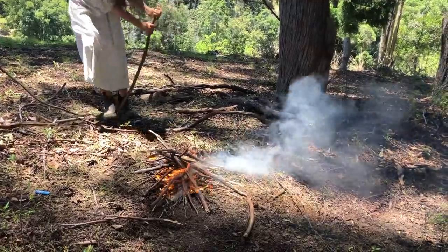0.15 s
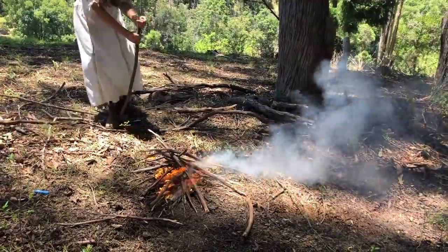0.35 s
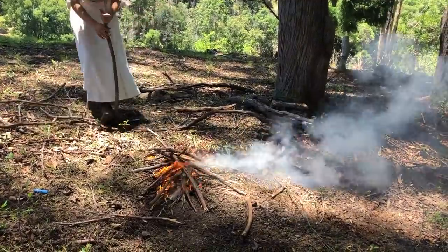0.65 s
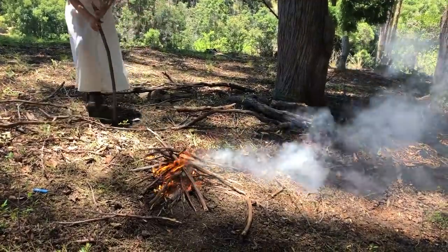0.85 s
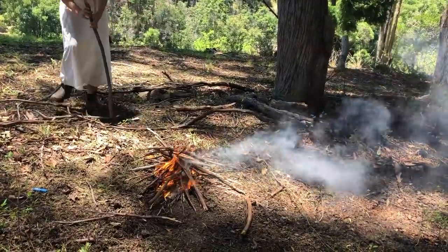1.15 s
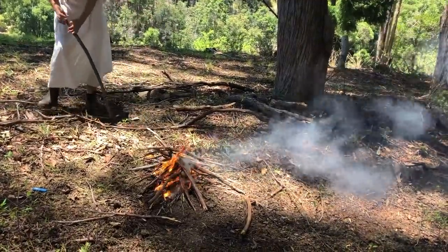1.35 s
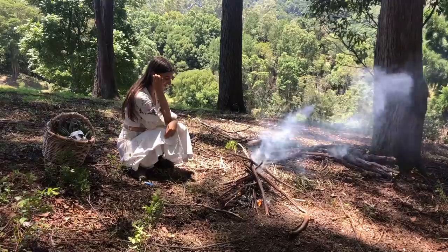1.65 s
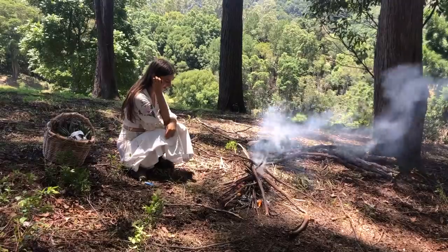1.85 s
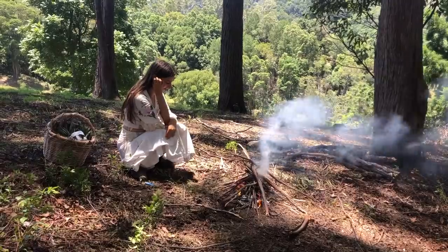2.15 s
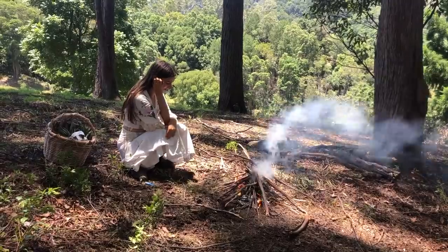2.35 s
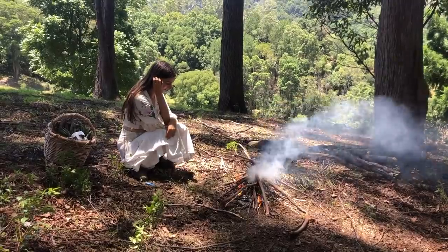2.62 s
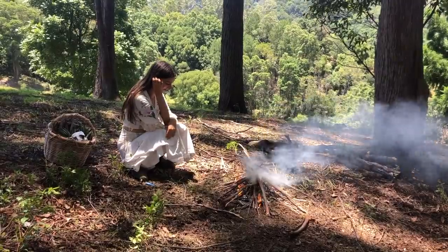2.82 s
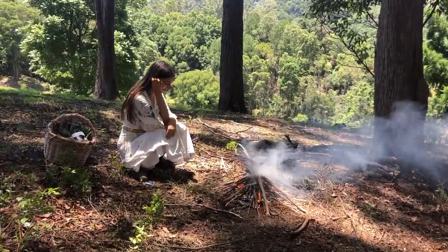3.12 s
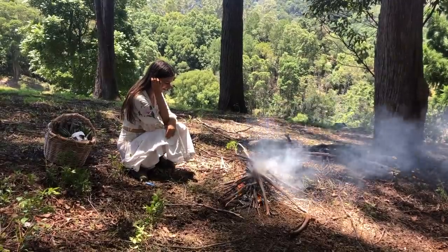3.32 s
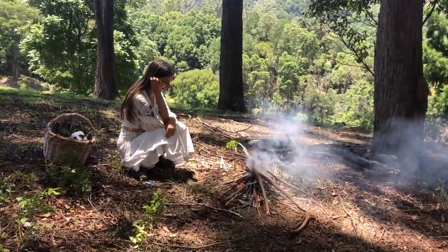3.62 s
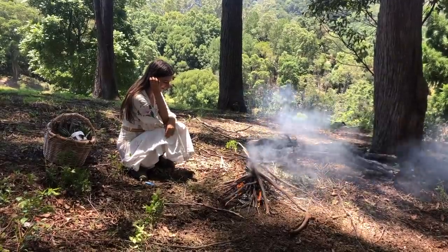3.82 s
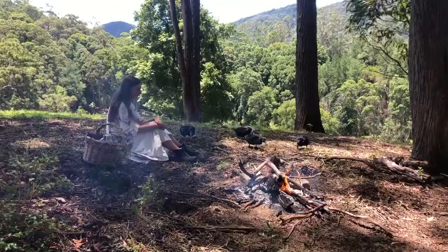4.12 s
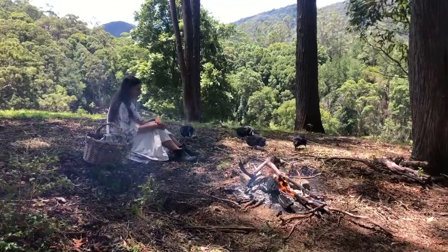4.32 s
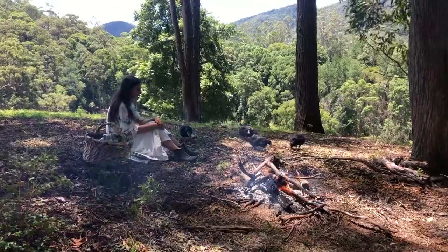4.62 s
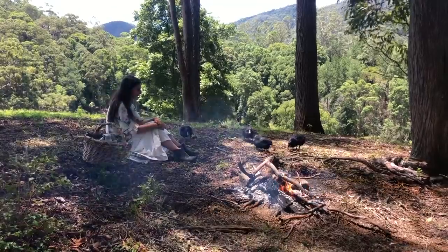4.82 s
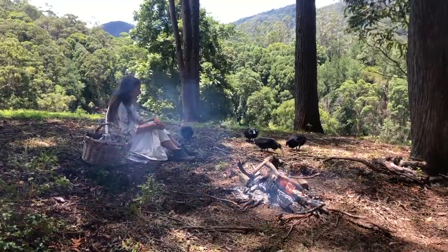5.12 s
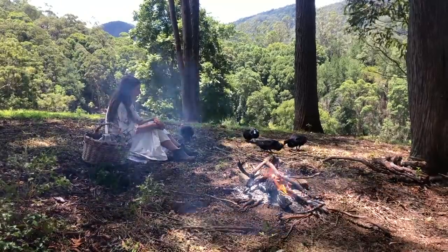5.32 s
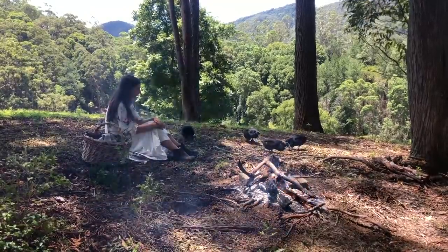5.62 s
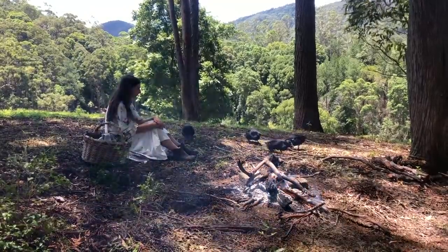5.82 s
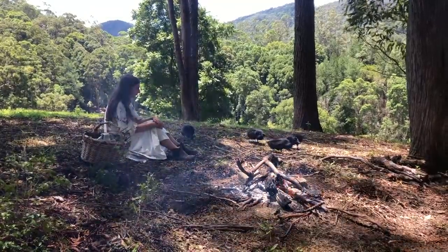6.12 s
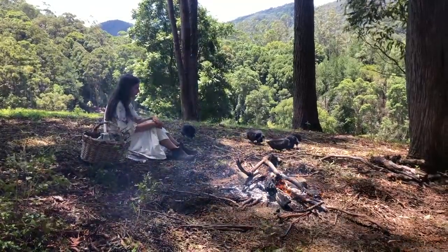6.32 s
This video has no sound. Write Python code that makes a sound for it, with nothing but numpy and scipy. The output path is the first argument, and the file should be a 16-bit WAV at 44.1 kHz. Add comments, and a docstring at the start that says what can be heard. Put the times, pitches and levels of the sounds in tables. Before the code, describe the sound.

A quiet wooded hillside with low breeze rumble, soft foliage hush and thin far-off cicadas throughout. At about 0.1 s a dry stick breaks close by in a rapid cluster of bright, splintery cracks, with dull boot thuds and a dense crunchy rush of leaf litter, renewed to 0.6 s and dying away by 0.9. Campfire snaps begin near 0.93, with knocks and another smaller rustle from 1.4 to 1.6. At 1.65 the scene cuts quieter: sparse sharp pops, tiny ticks, faint steam hisses around 2.2 and 3.3, short raspy bird chirps with forest echo. A strong snap comes at 3.45, and the loudest, a double crack with a soft thud, at 4.0. At 4.06 close cicadas click in abruptly, a steady high buzzing drone around 8 to 9 kHz until the end at about 6.5, with few small snaps, faint gliding bird calls, and slight leaf stirring after 6.1.

```python
"""A small campfire on a wooded hillside, in three scenes: burning wood snaps as sharp pulses with scatter, ticks and hisses.
First a dry stick breaks under a boot in bursts of noise, with dull thuds and leaf litter rustling in dense grains.
In the last scene cicadas set in with a click and drone close by as trains of tymbal clicks; others sing far off
throughout, as a band of noise. Birds call far off in the trees, as gliding, raspy tones, over the low rumble and
foliage hush of a light breeze (noise)."""
import sys
import numpy as np
from scipy import signal
from scipy.fft import rfft, irfft, next_fast_len
from scipy.io import wavfile
from scipy.ndimage import uniform_filter1d, map_coordinates

SR = 44100
rng = np.random.default_rng(int(sys.argv[2]) if len(sys.argv) > 2 else 0)


def transcribe(signal):
    """Save signal, clipped to [-1, 1], as a 16-bit WAV file at the path in sys.argv[1]."""
    frames = np.atleast_2d(signal).T
    limited = np.clip(frames, -1, 1)
    pcm = np.round(limited * 32767).astype(np.int16)
    wavfile.write(sys.argv[1], SR, pcm)


N = 284886

# the three scenes: start_s, rumble_db, foliage_db, far_cicadas_db
SCENES = [(0, -67.5, -68.5, -64), (1.648, -72, -70, -68.5), (4.058, -76.5, -71, -73)]


def amp(db):
    """Decibels to gain."""
    return 10 ** (np.asarray(db) / 20)


def unit(x):
    """Scale to rms 1."""
    return x / np.sqrt(np.mean(x ** 2) + 1e-20)


def along(points, hz):
    """Interpolate (Hz, value) points on a log frequency axis."""
    f, v = np.transpose(points)
    return np.interp(np.log(hz + 1), np.log(f), v)


def wobble(rate_hz):
    """Smooth random curve, rate_hz knots a second."""
    knots = rng.standard_normal(int(N * rate_hz / SR) + 4)
    return map_coordinates(knots, [np.arange(N) * rate_hz / SR])


def colour(x, points):
    """Causal (minimum-phase) filter with the given (Hz, dB) spectrum."""
    m = 2 * next_fast_len(len(x))
    log_gain = np.log(amp(along(points, np.fft.rfftfreq(m, 1 / SR))))
    cepstrum = irfft(log_gain)
    # fold the cepstrum onto positive time
    cepstrum[1:m // 2] *= 2
    cepstrum[m // 2 + 1:] = 0
    response = np.exp(rfft(cepstrum))
    return irfft(rfft(x, m) * response)[:len(x)]


def noise(points):
    """Coloured noise of rms 1."""
    return unit(colour(rng.standard_normal(N), points))


def fade(t, t60):
    """Exponential decay, 60 dB in t60 seconds."""
    return np.exp(-np.log(1000) * t / t60)


def add(track, s, x):
    """Mix x into the track at time s."""
    part = track[round(s * SR):][:len(x)]
    part += x[:len(part)]


def swell(middle_s, width_s):
    """Smooth bell of height 1 around a moment; width_s is the half-width at 1/e."""
    return np.exp(-((np.arange(N) / SR - middle_s) / width_s) ** 2)


def by_scene(values, cut_s=.007):
    """One value for each scene, held from cut to cut, with a short ramp at each cut."""
    starts = [row[0] for row in SCENES[1:]]
    index = np.searchsorted(starts, np.arange(N) / SR)
    steps = np.asarray(values, float)[index]
    return uniform_filter1d(steps, int(cut_s * SR))


def air(deep_db=-83, foliage_share=0.23):
    """Rumble of moving air and hush of foliage, both lifted by gusts, over a steady deep murmur from far away."""
    # spectrum of the rumble: hz, relative_db
    rumble_band = [(15, -62), (25, -24.5), (56, -1), (102, 1), (157, 1.5), (260, -4.5), (301, -5.5),
                   (343, -12), (600, -14), (780, -33.5), (1320, -120)]
    # spectrum of the foliage: hz, relative_db
    hush_band = [(100, -9), (400, 4.5), (1000, 1), (1500, -1), (2200, -2), (3100, -3.5), (4100, 0.5),
                 (5500, -3), (7000, -3.5), (11000, -9.5), (16000, -2.5)]
    # swells of the breeze: middle_s, half_width_s, rise_db
    gusts = [(.4, 0.32, 3), (2.92, .12, 4)]
    _, rumble_db, foliage_db, _ = np.transpose(SCENES)
    gust_db = sum(db * swell(s, width_s) for s, width_s, db in gusts)
    rumble = noise(rumble_band) * amp(by_scene(rumble_db) + gust_db + 0.91 * wobble(10))
    murmur = amp(deep_db) * noise([(30, -29.5), (70, 3.5), (100, -1.5), (200, -29.5), (600, -56.0)])
    hush_db = by_scene(foliage_db) + foliage_share * gust_db + 1.5 * wobble(13.0)
    return rumble + murmur + noise(hush_band) * amp(hush_db)


def cicada(rate_hz, count=5, rib_gap_s=.0014, rib_drop_db=7.5, jitter_s=.00008, offbeat=.45, weak_side_db=-4.0):
    """Two tymbals, one weaker, buckle in turn, rib after rib: a short run of fading clicks for each."""
    cycles = np.cumsum(rate_hz * (1 + .002 * wobble(3))) / SR + rng.random()
    starts_s = np.flatnonzero(np.diff(np.floor(cycles))) / SR
    # rows: strong side, weak side; columns: ribs
    gaps_s = rib_gap_s * rng.uniform(.6, 1.4, (2, count))
    ribs_s = np.cumsum(gaps_s, axis=1) + [[0], [offbeat / rate_hz]]
    drop_db = -rib_drop_db * np.arange(count) + [[0], [weak_side_db]]
    sizes = amp(drop_db + rng.standard_normal((2, count))).ravel()
    times_s = starts_s[:, None] + ribs_s.ravel() + jitter_s * rng.standard_normal((len(starts_s), 2 * count))
    sizes = sizes * amp(rng.standard_normal(times_s.shape))
    places = np.abs(times_s * SR).astype(int).ravel()
    return unit(np.bincount(places, sizes.ravel(), N)[:N])


def chorus(close_db=-44.5, crowd_db=2):
    """Two close cicadas stand out from the blur of many in the last scene; others sing far away throughout."""
    # close singers: cycles_per_s of each tymbal, relative_db
    singers = [(44.9, 6.5), (45.85, 4.5)]
    # resonance of the abdomen: hz, relative_db
    abdomen = [(3000, -46), (4600, -35.5), (6500, -29), (7100, -19.5), (7900, -3), (8450, 2), (9100, -0.5),
               (9550, -3), (10050, -10), (10400, -18.5), (11500, -29), (13000, -25), (14200, -32),
               (16000, -33)]
    # spectrum of the far cicadas: hz, relative_db
    far_band = [(6000, -50), (7200, -15.5), (7900, -5), (8450, -2), (9200, -8.5), (10000, -15),
                (11000, -35.5)]
    clicks = sum(amp(db) * cicada(rate_hz) for rate_hz, db in singers)
    crowd = amp(crowd_db) * noise(abdomen)
    close = unit(unit(colour(clicks, abdomen)) + crowd)
    *_, far_db = np.transpose(SCENES)
    far = noise(far_band) * amp(by_scene(far_db))
    return close * amp(close_db) * by_scene([0, 0, 1]) + far


def embers(ticks_per_s=10, tick_db=-45.5, spread_db=4):
    """Tiny random ticks of the fire in the first two scenes, and hissing spurts of steam from the wood."""
    # spurts of steam: middle_s, half_width_s, level_db
    spurts = [(1.7, 0.18, -85), (2.25, .24, -75.5), (3.27, 0.13, -77)]
    # spectrum of the steam: hz, relative_db
    sizzle = [(5000, -6), (11200, -13), (13000, 1), (15500, -16), (17000, -26)]
    sizes = amp(tick_db + spread_db * np.clip(rng.standard_normal(N), -2, 2))  # before colouring
    ticks = (rng.random(N) < ticks_per_s / SR) * sizes
    ticks = colour(ticks, [(200, -25), (3000, -3), (8000, -13), (16000, 9)])
    steam = sum(amp(db) * swell(s, width_s) for s, width_s, db in spurts)
    return ticks * by_scene([1, 1, 0]) + noise(sizzle) * steam


def scuffing(attack_s=0.025, t60_s=0.46):
    """Strength of the rustle: the leaves give, hold and settle; nothing stirs in the middle scene."""
    # scuffs through the litter: full_s (end of the rise), hold_s, level_db
    scuffs = [(0.107, 0.0083, -45.5), (0.225, 0.0055, -44), (0.294, 0.046, -47.5), (0.428, 0.033, -48),
              (0.539, 0.038, -51), (0.638, 0.021, -55.5), (0.725, .005, -56), (0.875, .07, -64),
              (0.993, 0.15, -70), (1.407, 0.05, -61.5), (1.5, 0.069, -58), (1.612, 0.016, -54.5),
              (6.174, 0.087, -65.5), (6.317, .02, -65)]
    t = np.arange(N) / SR
    each = []
    for s, hold_s, db in scuffs:
        rise = np.clip(1 + (t - s) / attack_s, 0, 1)
        settle = fade(np.maximum(t - s - hold_s, 0), t60_s)
        each.append(amp(db) * rise * settle)
    return np.linalg.norm(each, axis=0) * by_scene([1, 0, 1])


def litter(grains_per_s=800, spread_db=4, crush_db=-4, uneven_db=1.6):
    """Dry leaves crackle in dense grains, each dull or crisp, over the hiss of their rubbing."""
    # spectrum of the leaves: hz, relative_db
    leaves = [(120, -37.5), (200, 2), (366, -10), (671, -4), (1450, -6.5), (2860, -4.5), (3370, -3.5),
              (4520, -2.5), (13100, -4.5), (15100, -2.5), (16000, -14)]
    shape = (2, N)  # dull and crisp grains, grains_per_s of each
    hits = (rng.random(shape) < grains_per_s / SR) * rng.choice([-1, 1], shape)
    dull, crisp = hits * amp(spread_db * np.clip(rng.standard_normal(shape), -2, 2))
    crackle = colour(dull, [(5000, -1.0), (9000, -12)]) + colour(crisp, [(3500, -3.0), (7000, 3)])
    hiss = amp(crush_db) * noise(leaves)
    rustle = unit(unit(colour(crackle, leaves)) + hiss)
    return rustle * scuffing() * amp(uneven_db * wobble(90))


def stick(tear_t60_s=0.015, splinter_db=-21, splinter_t60_s=0.26, grain_db=3,
          count=7, gap_s=0.011, first_db=-32, dying_db_per_s=170):
    """Each bundle of fibres tears in a spiky burst and sheds finer splinters; thin fibres follow ever more weakly."""
    # main fibres give way: start_s, level_db
    bundles = [(0.0934, -13), (0.1135, -15.5), (0.1203, -25), (0.135, -32), (0.139, -19.5), (0.1442, -23.5),
               (0.1543, -26), (0.1612, -33)]
    # spectrum of tearing wood: hz, relative_db
    wood_band = [(120, -42), (200, -27), (322, -35), (635, -18.5), (1250, -18.5), (2020, -6.5), (2420, -4),
                 (2960, -1), (3370, -6.5), (4680, -0.5), (8270, 1.5), (11500, -4.5), (16000, -3.5)]
    out, t = np.zeros(N), np.arange(SR // 8) / SR
    lags_s = np.cumsum(gap_s * rng.uniform(.5, 1.5, count))
    thin = [(bundles[-1][0] + lag_s, first_db - dying_db_per_s * lag_s) for lag_s in lags_s]
    tear = fade(t, tear_t60_s) + amp(splinter_db) * fade(t, splinter_t60_s)
    for s, db in bundles + thin:
        fibres = rng.standard_normal(len(t)) * amp(grain_db * rng.standard_normal(len(t)))
        add(out, s, amp(db) * tear * unit(colour(fibres, wood_band)))
    return out


def thuds(skirt_db=-22):
    """Dull, quickly damped knocks on soft ground: decaying noise around one frequency."""
    # knocks of boots, stick and shifting firewood: start_s, level_db, centre_hz, t60_s
    knocks = [(0.094, -44, 1060, 0.059), (0.100, -42, 123, 0.096), (0.232, -51, 260, 0.038),
              (0.303, -45, 288, 0.037), (0.533, -50, 280, 0.12), (0.627, -39, 750, 0.019),
              (0.75, -46, 424, 0.023), (1.323, -51.5, 215, 0.081), (1.632, -50, 1140, 0.025),
              (2.455, -46.5, 400, 0.016), (4.003, -50.5, 193, 0.078)]
    out, t = np.zeros(N), np.arange(SR // 6) / SR
    for s, db, hz, t60_s in knocks:
        band = [(hz / 4, skirt_db), (hz, 0), (hz * 2, skirt_db), (hz * 10, -60)]
        soil = unit(colour(rng.standard_normal(len(t)), band))
        add(out, s, amp(db) * fade(t, t60_s) * soil)
    return out


def trees(x):
    """Diffuse answer of trunks and canopy: convolution with a noise tail that decays by frequency, 10 ms late."""
    # decay of the echo: hz, t60_s
    decay = [(200, .25), (2500, 0.33), (8000, 0.22), (16000, 0.068)]
    hz, t, z = signal.stft(rng.standard_normal(SR // 2), SR, nperseg=256)
    t60_s = along(decay, hz)[:, None]
    tail = signal.istft(z * fade(t, t60_s), SR, nperseg=256)[1]
    late = np.pad(x, (SR // 100, 0))
    return signal.fftconvolve(late, tail / np.linalg.norm(tail))[:N]


def snaps(scatter_db=-24, drier_per_db=0.2254, scatter_t60_s=0.017, bright_db=2):
    """Each is one sharp pressure pulse, then its decaying scatter off thin sticks; loud ones are drier."""
    # snaps of burning wood and twigs, and the click as the close cicadas set in (4.054 s):
    # start_s, pulse_db, body_db, treble_db
    cracks = [(0.9308, -17.5, -24, -29), (1.0957, -43, -8, 4), (1.1162, -33.5, -30, -7),
              (1.2257, -49, -5, 13), (1.3219, -25.5, -3.5, -5.5), (1.4947, -21.5, -8.5, -6),
              (1.611, -26.5, -7, 5), (1.619, -33, -11, -5), (1.709, -15.5, -7.5, -18),
              (1.7929, -26.5, -37, -1), (2.0478, -31, -12, 4.5), (2.2722, -32, -11, 2.5),
              (2.4547, -21.5, -32, -2.5), (2.5215, -35, -3, -5), (2.6534, -35.5, -7, -6),
              (2.7012, -32.5, -9, -14), (2.8624, -31, -25, -7), (2.8804, -27, -7.5, -21),
              (2.9533, -19.5, -48, -4), (3.4266, -32.5, -11, 5), (3.4548, -9, -8.5, -26),
              (3.5187, -38.5, -14, 4), (3.9942, -15, -10.5, 5), (4.0013, 0, -13.5, 2),
              (4.054, -25.5, -30, -5), (4.098, -31, -31, -12), (4.572, -28, -38, -8),
              (4.5927, -27, -24, -5), (5.1593, -26.5, -56, -18), (6.1777, -25.5, -41, -7),
              (6.3582, -20.5, -14, -6)]
    out, t = np.zeros(N), np.arange(SR // 16) / SR
    for s, db, body_db, treble_db in cracks:
        scatter = colour(rng.standard_normal(len(t)), [(700, 2.5), (5000, -3.5)])
        pulse = amp(scatter_db - drier_per_db * db) * fade(t, scatter_t60_s) * scatter
        pulse[0] += 1
        body = [(60, body_db - 16), (600, body_db + 3), (2400, -5.0), (3800, 0.0)]
        treble = [(7500, treble_db / 2 - 3.0), (13000, treble_db + bright_db)]
        add(out, s, amp(db) * colour(pulse, body + treble))
    return out


def chatter(count=10, low_hz=1400, high_hz=4000, note_db=-81, note_s=.055, octave_db=-6, rasp=0.26):
    """Short notes of farther birds that start in the middle scene, as rows like those of the calls."""
    start_s, end_s = SCENES[1][0], SCENES[2][0]
    rows = []
    for when, long, high, place in rng.random((count, 4)):
        s = start_s + (end_s - start_s) * when
        top_hz = low_hz * (high_hz / low_hz) ** high
        rows.append((s, note_s * (.5 + long), top_hz, place, note_db, octave_db, rasp))
    return rows


def birds(warble=.009, rasp_depth=0.125, flicker_db=3, sag_hz_per_s=9500, round_s=.04):
    """Each call is part of one arch of pitch; a hoarse throat makes pitch flutter and tears the tone into a rasp."""
    # calls: start_s, length_s, top_hz, top_place (0-1 of the call), level_db, octave_db, rasp (0-1)
    calls = [(0.94, 0.11, 2180, 0.04, -73, 0, 0.77), (1.745, 0.06, 2890, 0.96, -74.5, -16, 0.4),
             (1.84, 0.065, 2500, 0, -73, -3, 0.5), (2.112, 0.15, 3910, 0.48, -77, -10, .3),
             (2.169, .1, 2710, 0.07, -74, -2, 0.43), (2.16, 0.048, 1500, .95, -81, -9, 0),
             (2.63, 0.071, 1850, 0.24, -76.5, -1, 0.3), (2.88, .05, 1590, 0, -78, -6, .2),
             (2.887, 0.051, 2950, 0.06, -76, -11, .2), (3.145, .04, 2810, 0.88, -75, -6, 0.23),
             (3.322, 0.13, 1910, 0.16, -78.5, -1, 0), (3.909, 0.055, 1650, 0.02, -74, -6, .8),
             (4.072, 0.15, 2387, 0.19, -73, -3, 0.28), (4.315, 0.0394, 1687, 1, -70.5, -2, 0.94),
             (4.351, 0.15, 2377, .33, -74.5, -2, .25), (4.917, .16, 2430, .42, -73.5, 3, 0.34),
             (5.357, 0.054, 2300, 0.77, -72, -4, 0.94), (5.719, .085, 2350, .85, -73, -12, 0.2),
             (5.744, 0.075, 1560, .95, -76.5, -4, 0.63), (6.174, .11, 2330, 0.84, -72.5, -2, 0.91),
             (6.279, .11, 4730, .3, -69.5, -19, 0.5), (6.42, 0.09, 2390, 0.88, -72, -3, .6)]
    out = np.zeros(N)
    for s, length_s, top_hz, top_place, db, octave_db, rasp in calls + chatter():
        u = np.linspace(0, 1, int(length_s * SR))
        # pitch falls away on both sides of a rounded top
        hz = top_hz - sag_hz_per_s * (np.hypot((u - top_place) * length_s, round_s) - round_s)
        chance = rng.standard_normal((3, SR // 2))
        slow = unit(uniform_filter1d(chance[:2], size=300))[:, :len(u)]
        fast = unit(uniform_filter1d(chance[2], size=25))[:len(u)]
        flutter = 1 + warble * slow[0] + rasp_depth * rasp * fast
        phase = 2 * np.pi * np.cumsum(hz * flutter) / SR
        tone = np.sin(phase) + amp(octave_db) * np.sin(2 * phase)
        voice = tone * (1 + rasp * fast) * amp(flicker_db * slow[1])
        envelope = np.tanh(4 * np.sin(np.pi * u))
        add(out, s, amp(db) * envelope * unit(voice))
    return out


def scene():
    """Close sounds are dry or nearly so; the birds carry more of the forest's echo."""
    sharp = stick() + snaps()
    calls = birds()
    close = sharp + amp(-22) * trees(sharp) + thuds() + litter() + embers()
    far = calls + amp(-8) * trees(calls)
    return (close + far + chorus() + air())[None]


def record(dry, top_hz=15750):
    """Band limit: a steep elliptic low-pass at top_hz."""
    return signal.sosfilt(signal.ellip(10, .1, 70, top_hz, fs=SR, output="sos"), dry)


dry = scene()
out = record(dry)
transcribe(out)
```